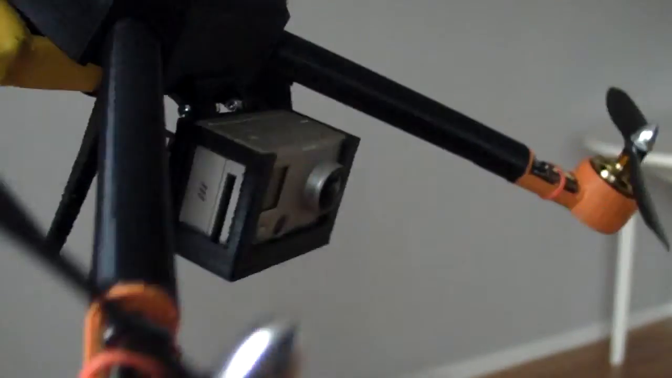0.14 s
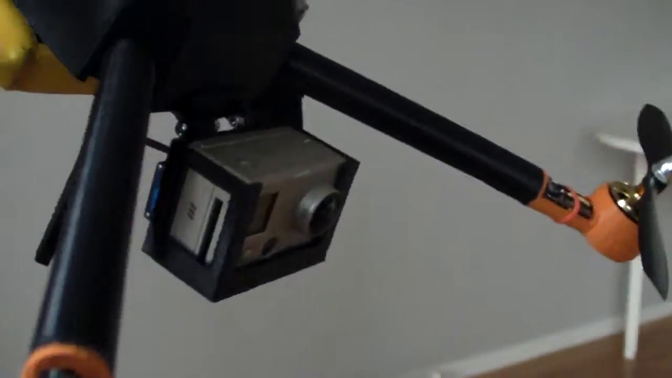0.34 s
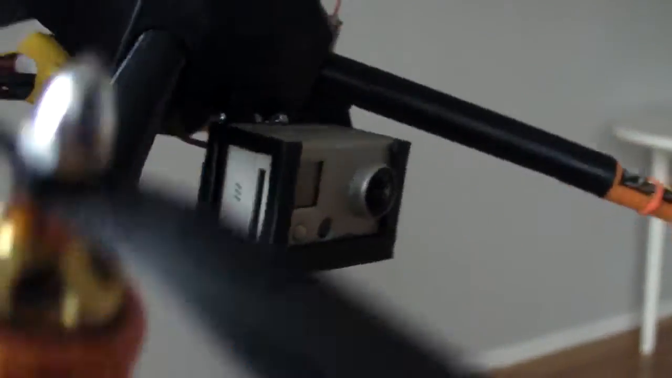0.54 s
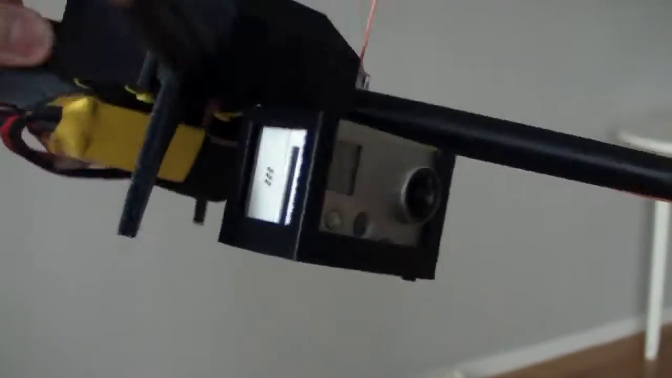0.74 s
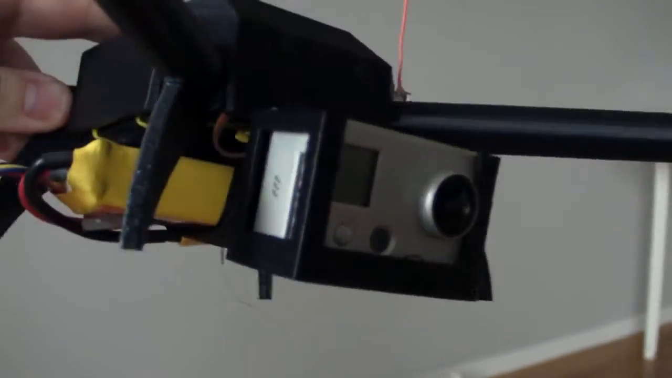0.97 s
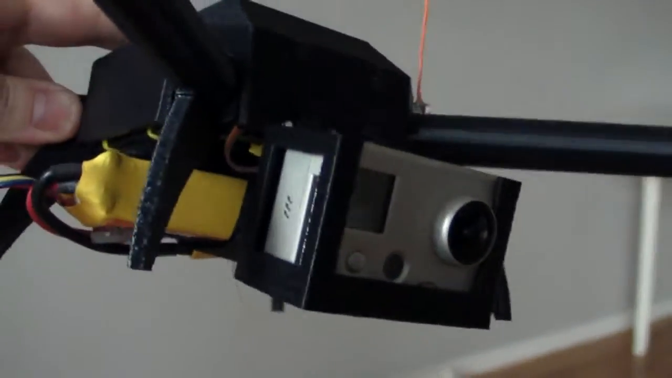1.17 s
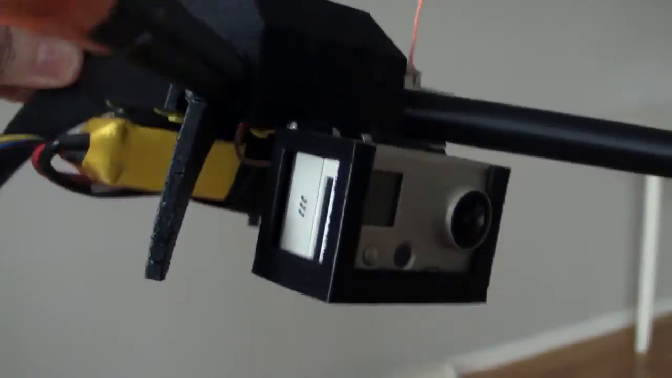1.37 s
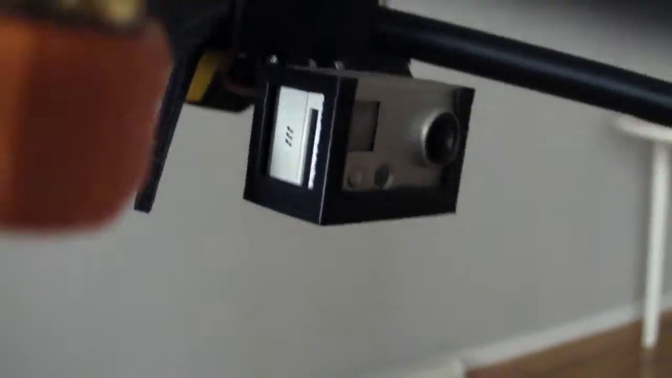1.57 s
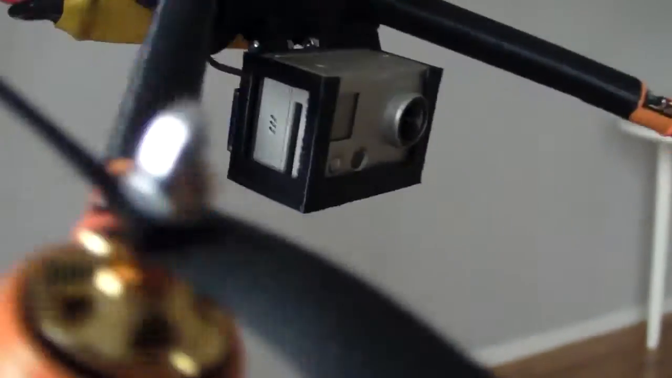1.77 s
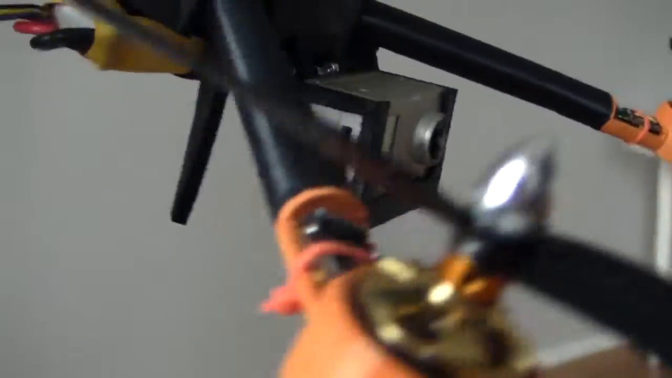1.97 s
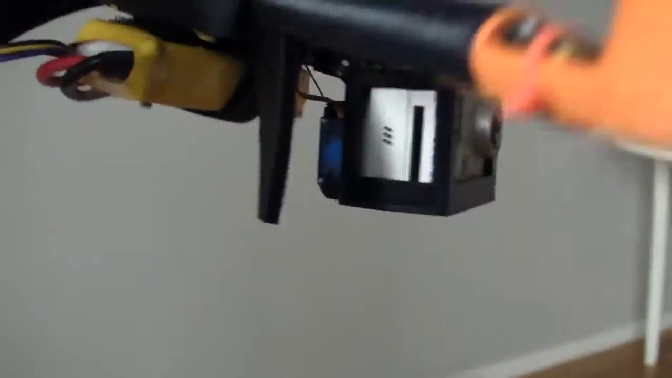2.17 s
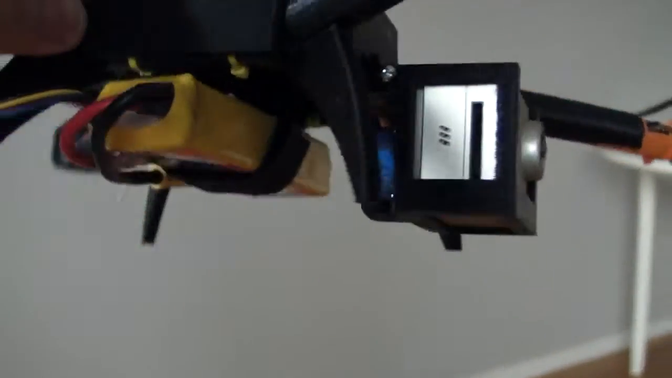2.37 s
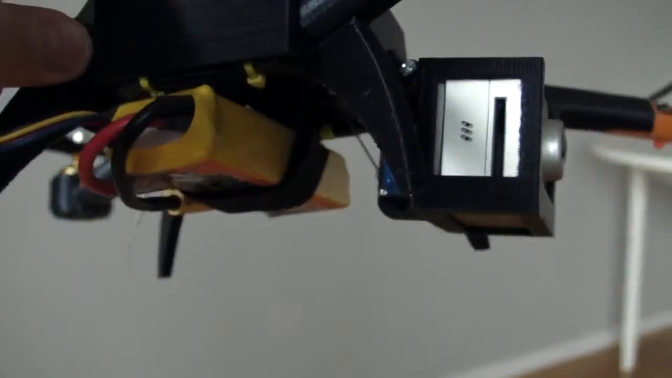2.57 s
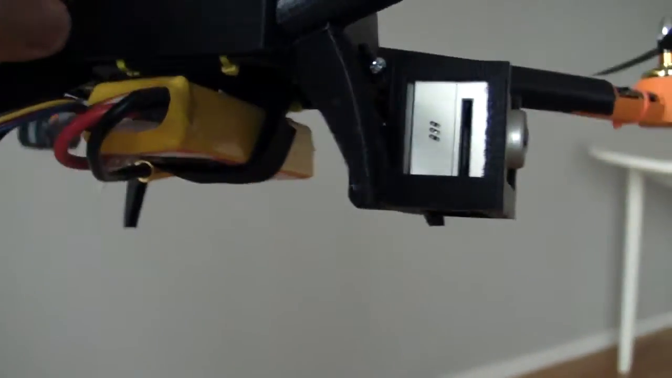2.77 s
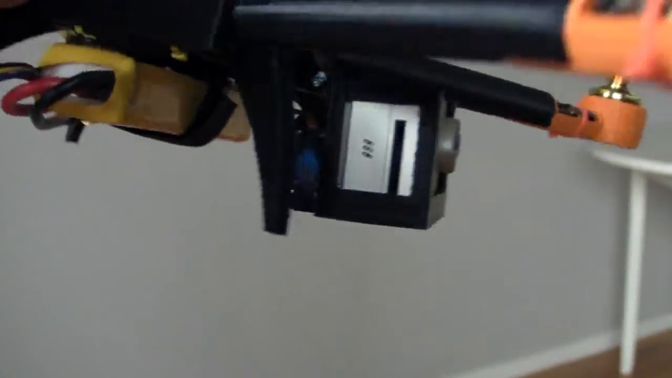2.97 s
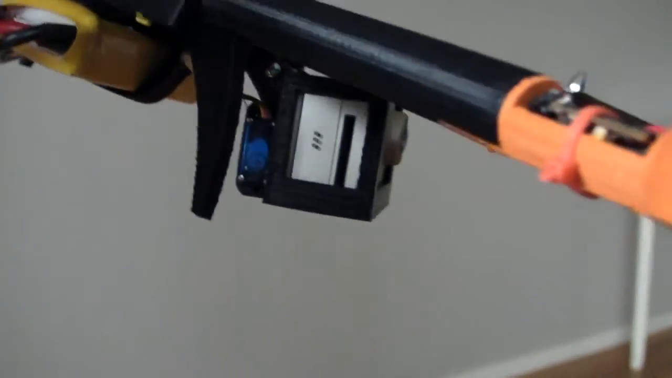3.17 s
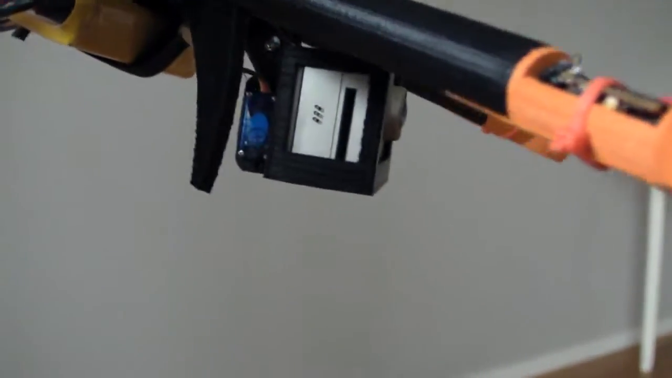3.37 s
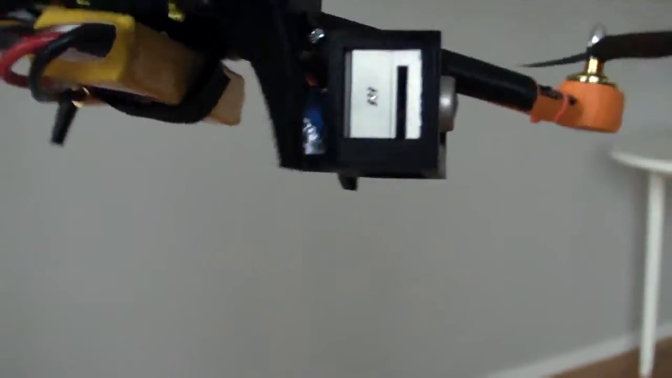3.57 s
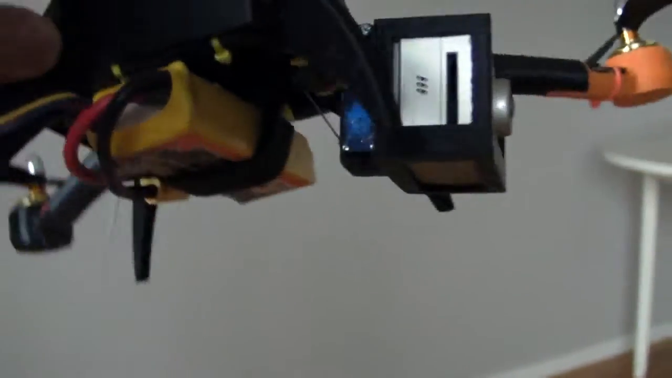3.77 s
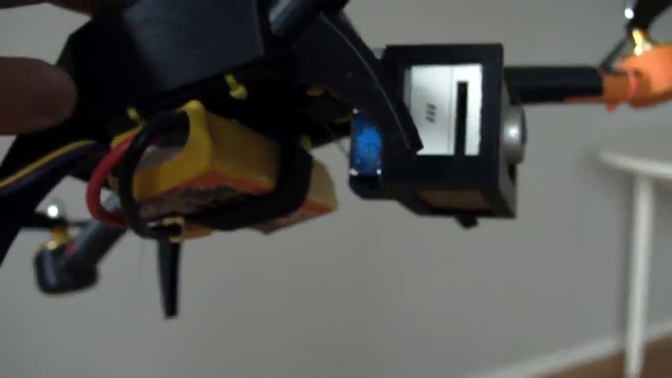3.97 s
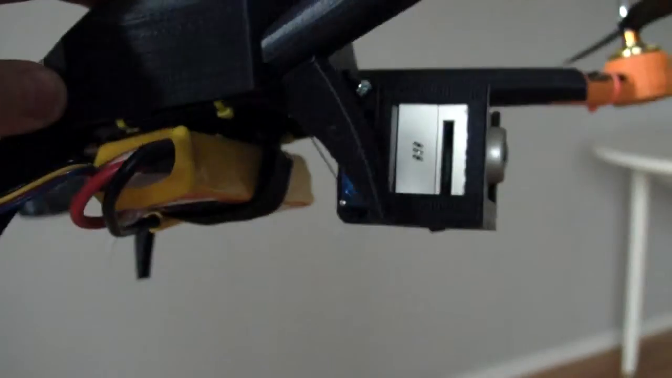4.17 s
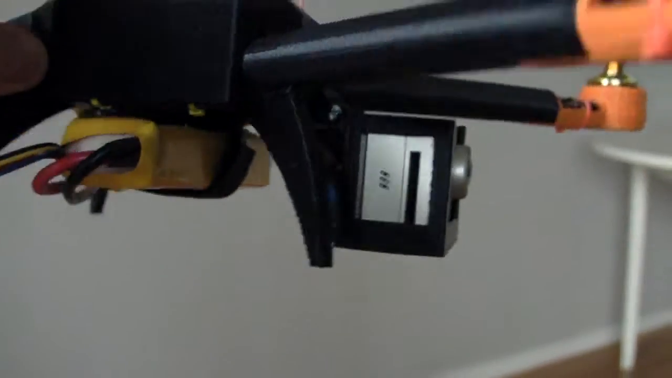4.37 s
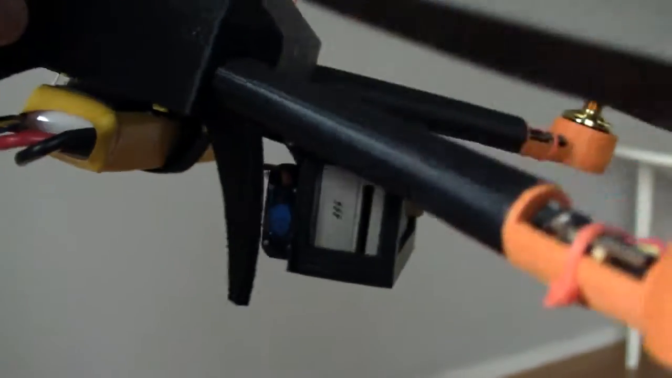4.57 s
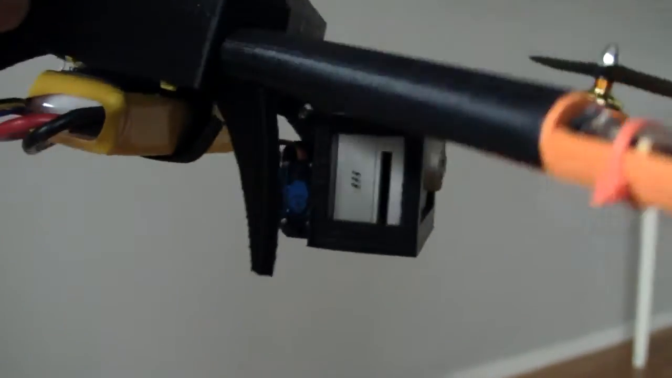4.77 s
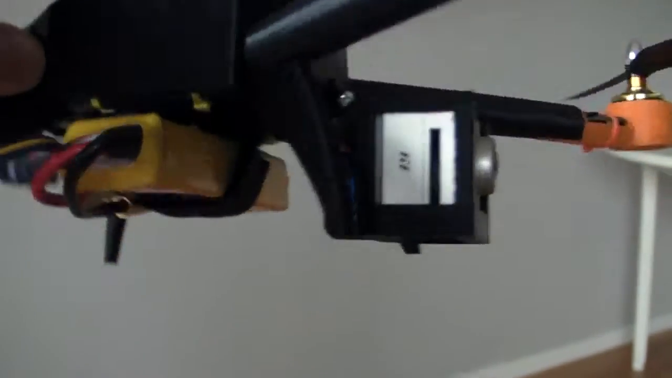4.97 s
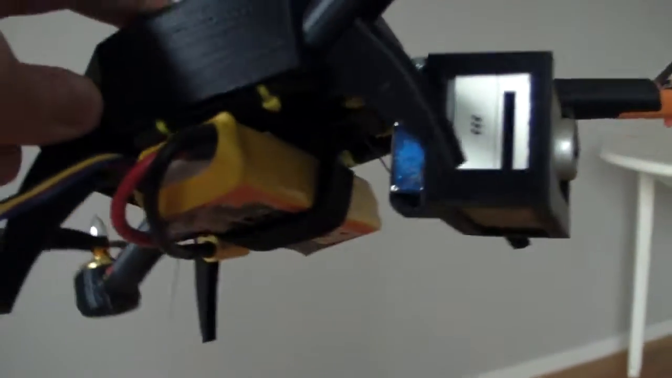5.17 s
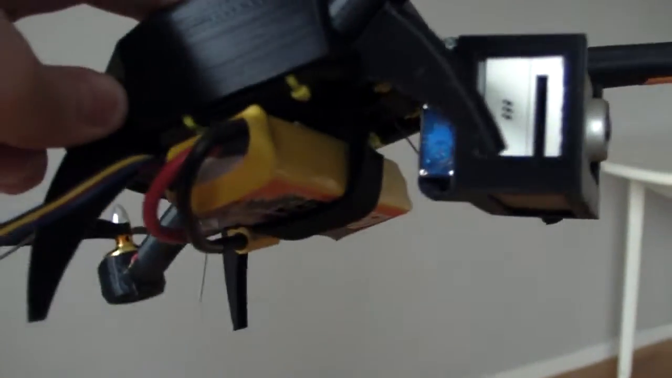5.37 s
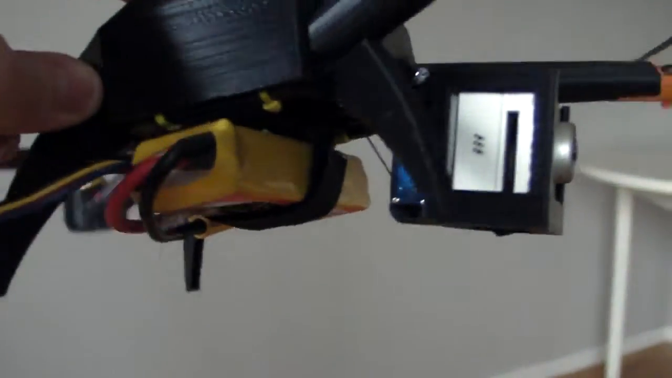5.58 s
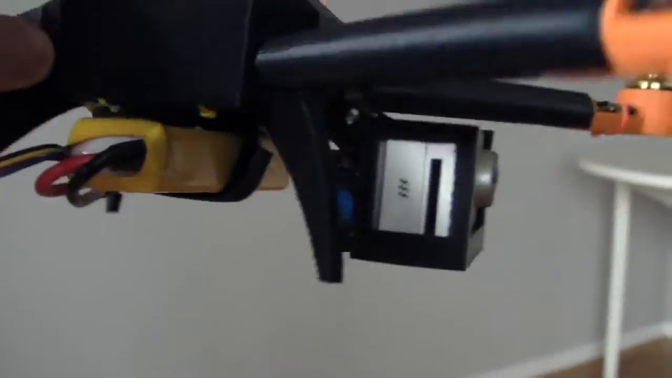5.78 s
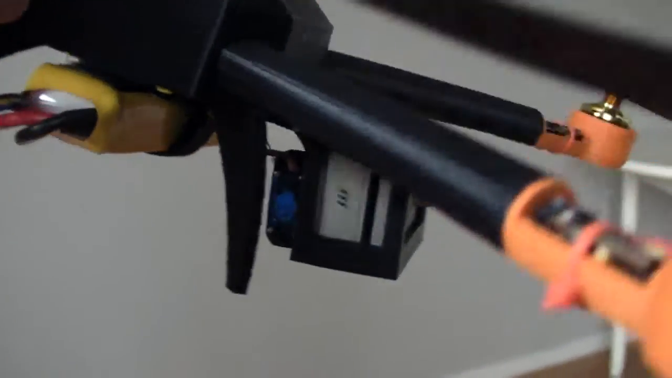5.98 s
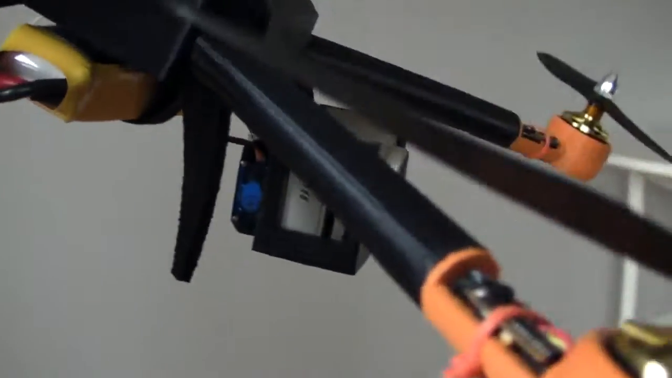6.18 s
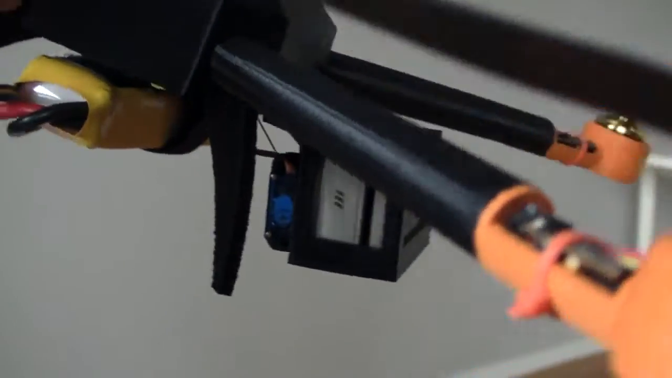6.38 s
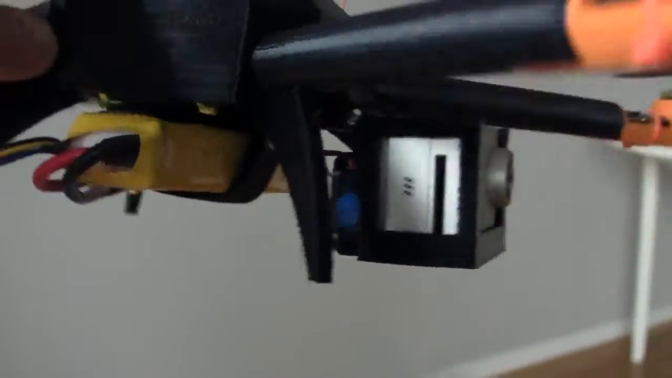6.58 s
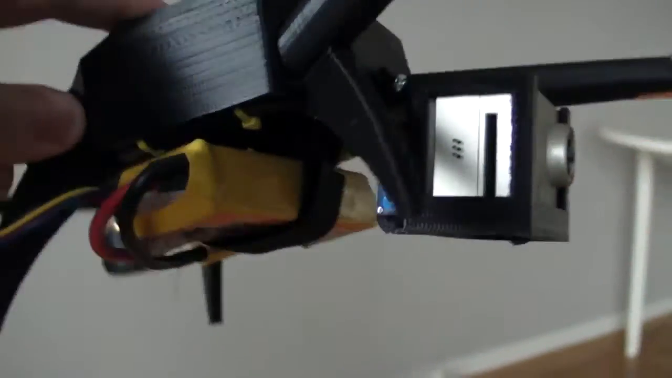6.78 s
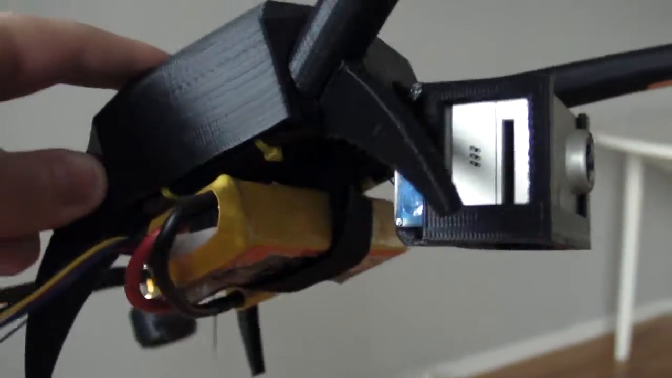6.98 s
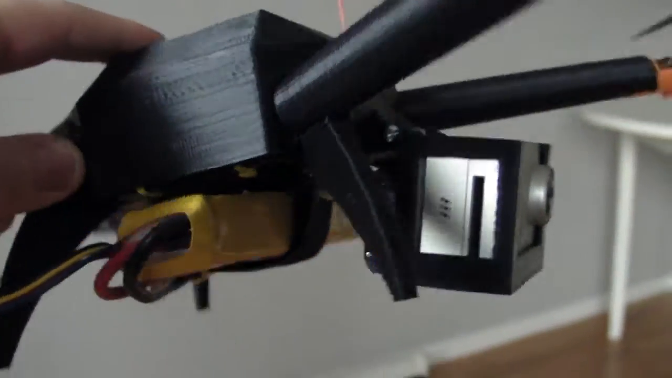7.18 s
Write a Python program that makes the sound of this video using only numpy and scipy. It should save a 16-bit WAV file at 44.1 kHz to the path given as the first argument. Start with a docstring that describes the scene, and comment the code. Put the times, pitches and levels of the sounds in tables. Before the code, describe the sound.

A tiny servo whirs in raspy, stuttering bursts with a few sharp plastic clicks, over a faint steady room hum.

```python
"""In a room, a hand rocks a small multirotor to and fro while a micro servo keeps its camera mount level.
Impacts of the plastic gear teeth excite the resonances of the case: they rattle under a train of drive
pulses, surge at each correction and now and then clack through their slack. The frame takes a few soft
knocks. Behind it a mains appliance hums over the low rush of the room's air."""
import sys
import numpy as np
from scipy import signal
from scipy.fft import rfft, irfft
from scipy.io import wavfile
from scipy.ndimage import map_coordinates

SR = 44100
rng = np.random.default_rng(int(sys.argv[2]) if len(sys.argv) > 2 else 0)


def persist_wave(psi):
    """Save psi, clipped to +-1, as 16-bit WAV."""
    counts = np.round(np.clip(psi, -1, 1) * 32767).astype(np.int16)
    wavfile.write(sys.argv[1], SR, np.atleast_2d(counts).T)


N = 318843
TIME = np.arange(N) / SR
HZ = np.fft.rfftfreq(4096, 1 / SR)
DRIVE_HZ = 55.3  # rate of the motor's drive pulses


def amp(db):
    """Amplitude ratio of a level in decibels."""
    return 10 ** (np.asarray(db) / 20)


def unit(x):
    """Normalisation to rms 1."""
    return x / np.sqrt(np.mean(x ** 2) + 1e-20)


def curve(points, hz):
    """Interpolation of rows (frequency_hz, value) on a log-frequency axis."""
    f, value = np.transpose(points)
    return np.interp(np.log(hz + 1), np.log(f), value)


def peaks(rows):
    """Lorentzian peaks and dips, in dB over HZ."""
    return sum(db / (1 + (2 * (HZ - hz) / width) ** 2) for hz, width, db in rows)


def add(mix, start_s, sound):
    """Superposition of a sound on the mix."""
    part = mix[max(round(start_s * SR), 0):][:len(sound)]
    part += sound[:len(part)]


def colour(x, db):
    """Minimum-phase filter with the gain db over HZ: it rings only after it is struck."""
    log_gain = np.log(amp(np.r_[db, db[-2:0:-1]]))
    taps = np.fft.ifft(np.exp(np.conj(signal.hilbert(log_gain)))).real
    return signal.oaconvolve(x, taps)[:len(x)]


def band(x, low_hz, high_hz):
    """Zero-phase band-pass, so that neighbouring bands join evenly; rms 1."""
    return unit(signal.sosfiltfilt(signal.butter(5, [low_hz, high_hz], "band", fs=SR, output="sos"), x))


def resonate(x, hz, width_hz):
    """Damped resonance whose centre follows the curve hz."""
    turn = np.exp(2j * np.pi * np.cumsum(hz) / SR)
    r = np.exp(-np.pi * width_hz / SR)
    return 2 * (turn * signal.lfilter([(1 - r) ** 2], [1, -2 * r, r * r], x / turn)).real


def drift(rate_hz, size):
    """Smooth random process of rms 1, changing about rate_hz times a second."""
    knots = rng.standard_normal(4096)
    coarse = np.arange(0, size + 32, 32)
    smooth = map_coordinates(knots, [coarse * rate_hz / SR], order=3, mode="wrap")
    return unit(np.interp(np.arange(size), coarse, smooth))


def crossings(turns):
    """Impulse train: one click each time the count of turns passes a whole number."""
    return np.diff(np.floor(turns), prepend=np.floor(turns[0]))


# spectrum of the room's air: frequency_hz, relative_level_db
AIR_SPECTRUM = [(15, -4), (30, -12), (60, -3.5), (110, -0.5), (170, 3.5), (270, -2), (370, 3.5), (500, -7),
                (800, -8.5), (1300, -12.5), (2500, -17.5), (5000, -23.5), (10000, -27.5), (15000, -55)]
# its likeness at the two microphones: frequency_hz, correlation
AIR_CORRELATION = [(30, 0.86), (300, 0.63), (700, 0.33), (3000, 0.82), (12000, 0)]


def air(level_db=-45.5, swell_db=2.0, crossover_hz=450):
    """Partly coherent noise: the rush of the room, its low end gently swelling."""
    hz = np.fft.rfftfreq(N, 1 / SR)
    left, other = rfft(rng.standard_normal((2, N)))
    same = np.clip(curve(AIR_CORRELATION, hz), 0, 1)
    right = same * left + np.sqrt(1 - same ** 2) * other
    spectra = np.array([left, right]) * amp(curve(AIR_SPECTRUM, hz))
    low = 1 / (1 + (hz / crossover_hz) ** 4)
    rumble = irfft(spectra * low, N) * amp(swell_db * drift(8.3, N))
    return amp(level_db) * unit(rumble + irfft(spectra * (1 - low), N))


# partials of the appliance's hum: harmonic_number, rms_level_db
HUM_HARMONICS = [(1, -88), (2, -58), (3, -58), (4, -61), (5, -57), (6, -55), (7, -60.5), (8, -62.5),
                 (9, -72.5), (10, -71)]


def hum(mains_hz=59.95, waver_db=-1.0, slip_rad=0.33):
    """Harmonic series: wavering partials, nearly in phase, sum to one soft buzz each mains cycle."""
    out = np.zeros(N)
    for harmonic, db in HUM_HARMONICS:
        peak = np.sqrt(2) * amp(db + waver_db * drift(3.38, N))
        out += peak * np.cos(2 * np.pi * harmonic * mains_hz * TIME + slip_rad * drift(1.887, N))
    return out


# reverberation time of the room: frequency_hz, t60_s
ROOM_DECAY = [(300, 0.51), (2500, 1), (7000, 0.54), (12000, 0.37)]


def room(x, early_db=-10, early_s=0.011, tail_db=-11):
    """Reverberation: early scatter from nearby things, then an exponentially decaying diffuse tail."""
    t = np.arange(SR) / SR
    taps = rng.standard_normal((2, SR)) * (rng.random((2, SR)) < .1)
    # small things scatter mostly treble
    early = np.diff(taps * np.exp(-t / early_s) * (t > .0005), prepend=0)
    hz, when, spectra = signal.stft(taps * (t > .008), SR, nperseg=256)
    decay = amp(-60 * when / curve(ROOM_DECAY, hz)[:, None])
    tail = signal.istft(spectra * decay, SR, nperseg=256)[1][:, :SR]
    response = sum(amp(db) * part / np.linalg.norm(part, axis=1, keepdims=True)
                   for db, part in ((early_db, early), (tail_db, tail)))
    return signal.fftconvolve(x[None], response, axes=1)[:, :N]


def airframe(x, echo_db=-6.5, delays_s=(.000295, .003), sway_s=.00007, apart_s=.000026, count=8):
    """Comb filtering: reflections off arms and battery shift as the craft rocks, unlike on each side."""
    echoes, samples = np.zeros((2, N)), np.arange(N)
    oversampled = signal.resample_poly(x, up=4, down=1)
    for delay in np.geomspace(*delays_s, count):
        path = delay * rng.uniform(.8, 1.2) + sway_s * drift(3.5, N)
        sign = rng.choice([-1, 1])
        side = apart_s * rng.choice([-1, 1]) * rng.uniform(.5, 1.5)
        for echo, lag in zip(echoes, (path - side, path + side)):
            echo += sign * map_coordinates(oversampled, [4 * (samples - lag * SR)], order=1)
    return (x + amp(echo_db) * echoes / np.sqrt(count)) / np.sqrt(1 + amp(2 * echo_db))


# left microphone relative to the right: frequency_hz, phase_lead_rad, level_db
PAIR_RESPONSE = [(3800, 1, 0), (6200, -0.79, -0.5), (7450, -0.027, 0.5), (8300, -0.65, -0.5),
                 (9800, -1.62, 2.5), (11600, -1.57, 0), (12400, -2.3, -5.5), (15000, -1.2, -2)]


def microphone_pair(x, taper_hz=5000):
    """Phase and level cues of near sound at two microphones; the phase lead fades out below taper_hz."""
    rows = np.array(PAIR_RESPONSE)
    lead = curve(rows[:, :2], HZ) * np.minimum(HZ / taper_hz, 1) ** 2
    half = np.exp(.5j * lead) * amp(curve(rows[:, ::2], HZ) / 2)
    taps = np.fft.fftshift(irfft(np.array([half, 1 / half])), axes=1)
    return signal.oaconvolve(x, taps, axes=1)[:, len(HZ) - 1:][:, :N]


# soft knocks on the frame: start_s, level_db, pitch_hz, t60_s
FRAME_KNOCKS = [(2.776, -28, 257, 0.024), (2.8, -29.5, 155, 0.09), (3.3749, -30.5, 390, 0.084),
                (6.118, -35.5, 684, 0.033)]


def knocks():
    """Damped free vibration: each dull thud is one quickly decaying mode."""
    out, t = np.zeros(N), np.arange(SR // 4) / SR
    for start, db, hz, t60 in FRAME_KNOCKS:
        add(out, start, amp(db - 60 * t / t60) * np.sin(2 * np.pi * hz * t))
    return out


# modes of the frame: pitch_hz, relative_level_db, t60_s
FRAME_MODES = [(1923, -12, 0.045), (2274, -12, 0.09), (2410, -1, 0.017), (2545, -11, 0.07),
               (2830, -14.5, 0.033), (3190, -9, 0.032), (3660, -5.5, 0.039), (3910, 4, 0.012),
               (5640, 0, .02), (7640, 6, 0.019)]


def frame_ring(t, vary_db=2, attack_s=0.00022):
    """Modal superposition: a blow rings every mode of the frame, each with its own decay."""
    ring = np.zeros(len(t))
    for hz, db, t60 in FRAME_MODES:
        envelope = amp(db + vary_db * rng.uniform(-1, 1) - 60 * t / t60)
        ring += envelope * np.sin(2 * np.pi * (hz * t + rng.random()))
    return ring * (1 - np.exp(-t / attack_s))


# spectrum of a tooth's crack: frequency_hz, relative_level_db
CRACK_SPECTRUM = [(300, -31), (1200, -30), (1900, 3), (4500, -8), (6500, 4), (10500, 9.5), (12500, -5),
                  (15000, -8)]
# jumps of the gears through their slack: time_s, crack_db, ring_db, squeak_db, grind_db, low_cut_hz
BACKLASH_JUMPS = [(0.0515, -9, -22.5, -28, -33.5, 2180), (0.631, -17, -45, -60, -55, 3000),
                  (0.776, -18, -49, -62, -60, 3000), (0.833, -24, -44, -60, -60, 4500),
                  (0.8835, -21, -42, -60, -62, 4500), (1.7088, -12, -24.5, -18, -33, 2220),
                  (3.1558, -19, -19.5, -22, -32.5, 1610), (6.116, -2, -17.5, -46, -40, 1610),
                  (6.4246, -26, -35, -67, -55, 1500), (6.464, -24, -41, -55, -62, 1500)]


def clacks(climb_s=0.0039, crack_s=0.001, bounce_s=.0045, bounce_db=-14,
           grind_s=0.016, grind_width_hz=2300, squeak_hz=13500, squeak_s=0.001):
    """Backlash: a tooth grinds up its neighbour, snaps over and squeaks; loose parts rebound twice."""
    out, t = np.zeros(N), np.arange(-SR // 25, SR // 3) / SR
    after = np.maximum(t, 0)
    grinding = np.exp(-abs(t) / grind_s)
    force = np.where(t < 0, amp(-20) * np.exp(-abs(t) / climb_s), np.exp(-after / crack_s))
    for when, crack_db, ring_db, squeak_db, grind_db, low_hz in BACKLASH_JUMPS:
        high_pass = signal.butter(4, low_hz, "high", fs=SR, output="sos")
        for k in range(3):
            ring = frame_ring(after)
            crack = unit(colour(rng.standard_normal(len(t)), curve(CRACK_SPECTRUM, HZ))) * force
            # on a rebound the crack loses twice as many decibels as the ring
            blow = amp(crack_db + k * bounce_db) * crack + amp(ring_db) * ring
            delay = k * bounce_s * (1 + 0.22 * rng.uniform(-1, 1))
            add(out, when + t[0] + delay, amp(k * bounce_db) * signal.sosfilt(high_pass, blow))
        grind = band(teeth(t, np.ones(len(t))), low_hz, low_hz + grind_width_hz) * grinding
        squeak = unit(resonate(rng.standard_normal(len(t)), np.full(len(t), squeak_hz), width_hz=1500))
        squeak *= np.exp(-abs(t) / squeak_s) + amp(-15) * grinding
        add(out, when + t[0], amp(grind_db) * grind + amp(squeak_db) * squeak)
    return out


def teeth(t, speed, mesh_hz=1000, hunt=.1, play=.07, catch_db=0.62,
          shaft_hz=340.7, bind_s=.00055, bind_spread_db=4.6, free_run=.72, scrape=0.7):
    """Impact and friction: loose teeth strike unevenly, slide, and bind once a shaft turn; rms 1."""
    force_db, sliding, bite = rng.standard_normal((3, len(t)))
    pace = speed ** .2
    mesh_turns = np.cumsum(mesh_hz * pace * np.exp(hunt * drift(45, len(t)))) / SR
    mesh_turns = np.maximum.accumulate(mesh_turns + play * drift(1100, len(t)))
    impacts = crossings(mesh_turns) * amp(np.clip(force_db, -2, 2))
    contact = unit(impacts) + scrape * sliding
    # each bind swells to a clump of chatter that peaks after bind_s
    shaft_turns = np.cumsum(shaft_hz * pace * np.exp(.2 * drift(120, len(t)))) / SR
    binds = crossings(shaft_turns) * amp(bind_spread_db * np.clip(bite, -2, 1))
    clumps = unit(signal.lfilter([1], np.poly([np.exp(-1 / (bind_s * SR))] * 2), binds))
    # the motor gets one push for each drive pulse
    throb_db = .9 * np.cos(2 * np.pi * DRIVE_HZ * t + .5 * drift(10, len(t)))
    return unit(contact * (free_run + clumps) * amp(throb_db + catch_db * drift(160.7, len(t))))


# gear case driven on the backward or the forward tooth flank: frequency_hz, gain_db
BACKWARD_FLANK = [(100, -40.5), (1500.0, -18.5), (2000.0, -21), (3000.0, -19.5), (3600.0, -14),
                  (4300.0, -11.5), (5000.0, 0), (5600.0, 5.5), (6200.0, 1.5), (7200.0, 4.5), (7700, 8),
                  (8800.0, 2), (10600.0, -12), (12200.0, -21.5), (15000, -27.5)]
FORWARD_FLANK = [(100, -42), (1500.0, -22), (2000.0, -25.5), (3000.0, -23), (3600.0, -16.5),
                 (4300.0, -20.5), (5000.0, -4), (5600.0, 5), (6200.0, 9.5), (7200.0, 8), (8800.0, 3.5),
                 (10600.0, -4.5), (12200.0, -15), (15000, -23)]
# narrow resonances and dips of case and mount: centre_hz, width_hz, gain_db
CASE_RESONANCES = [(1030, 110, -7.5), (1594, 280, -7), (1947, 160, 5.5), (2223, 136, 7.5), (2566, 65, 4.5),
                   (3100, 160, 2), (3820, 140, -1), (4270, 220, -1), (4578, 60, 8), (5760, 300, 0.5),
                   (6150, 350, -4), (7710, 130, 3.5), (8570, 320, 4), (9670, 300, -2)]


def gear_case(x, forward, hollow_db, spacing_hz=125, shift_hz=23, peak_limit=1.6, count=11):
    """Forced vibration: the teeth ring the case, whose many small resonances come and go at random."""
    flank = FORWARD_FLANK if forward else BACKWARD_FLANK
    case_db = curve(flank, HZ) + peaks(CASE_RESONANCES) + hollow_db
    weights = np.array([np.exp(5.6 * drift(shift_hz, len(x))) for _ in range(count)])
    weights /= weights.sum(axis=0)
    depth_db = np.interp(HZ, [3500, 6000], [6, 4.5])
    out = np.zeros(len(x))
    for weight in weights:
        knots = rng.standard_normal(len(HZ))
        ripple = unit(map_coordinates(knots, [HZ / spacing_hz], order=3, mode="wrap"))
        out += weight * colour(x, case_db + depth_db * np.minimum(ripple, peak_limit))
    return out


def nudges(share=0.41, level_db=-2, spread_db=3, length_s=0.013):
    """Random trials: some drive pulses bring a small correction; rows time_s, relative_db, length_s."""
    pulses = np.arange(0, N / SR, 1 / DRIVE_HZ)
    chosen = rng.random(len(pulses)) < share
    levels = level_db + spread_db * rng.standard_normal(len(pulses))
    return [(when, db, length_s) for when, db in zip(pulses[chosen], levels[chosen])]


def correction_power(rows):
    """Addition of powers: each correction bites quickly and lets go more gently."""
    power, t = np.zeros(N), np.arange(-SR // 20, SR // 20) / SR
    for when, db, length in rows:
        reach = abs(2 * t / length)
        add(power, when + t[0], amp(2 * db) * .5 ** np.where(t < 0, reach ** 4, reach ** 3))
    return power


# the motor's corrections, from twitches to long pushes: peak_s, level_db, length_s
CORRECTIONS = [(.066, -26, 0.02), (.102, -30, 0.015), (.114, -36, 0.0055), (.561, -31, 0.0042),
               (.579, -30, 0.019), (.602, -24.5, 0.007), (.617, -24, 0.019), (.644, -33, 0.011),
               (.696, -22, 0.011), (.75, -26.5, 0.0074), (.812, -31, 0.0048), (.833, -25, 0.004),
               (.85, -26.5, 0.02), (.867, -32, .006), (.891, -19.5, 0.002), (.905, -27, 0.013),
               (.961, -22.5, 0.019), (.972, -19.5, 0.0027), (.993, -23, 0.0025), (1.015, -25, 0.021),
               (1.025, -23, 0.0044), (1.078, -27, 0.0023), (1.1, -28, 0.0019), (1.127, -28, 0.0023),
               (1.17, -22, 0.011), (1.188, -39, 0.0026), (1.226, -23, 0.0069), (1.241, -22.5, 0.0082),
               (1.283, -24, 0.0067), (1.303, -25, 0.019), (1.342, -25.5, 0.024), (1.386, -25, 0.0081),
               (1.401, -25, 0.0078), (1.441, -29, .008), (1.458, -31, .014), (1.508, -29, 0.023),
               (1.54, -39, 0.012), (1.59, -25, 0.038), (1.651, -25.5, 0.026), (1.68, -26, 0.025),
               (1.705, -27.5, 0.03), (1.732, -26.5, 0.029), (1.772, -23.5, 0.017), (1.787, -29, .014),
               (2.048, -38, 0.028), (2.087, -29, 0.01), (2.121, -31, 0.016), (2.137, -30, 0.027),
               (2.2, -37, 0.014), (2.27, -35, 0.0087), (2.312, -36, 0.011), (2.35, -35, 0.01),
               (2.516, -29, 0.0017), (2.532, -24.5, 0.0026), (2.579, -39, 0.0052), (2.679, -42, 0.009),
               (2.735, -32.5, 0.012), (2.754, -26.5, 0.011), (2.818, -37, 0.017), (2.859, -32, 0.005),
               (2.877, -28, 0.0033), (2.952, -29, .006), (2.966, -28, 0.0098), (3.005, -31.5, 0.033),
               (3.146, -32, .012), (3.19, -36, 0.011), (3.205, -34, 0.0087), (3.314, -37, 0.0049),
               (3.412, -29.5, .008), (3.446, -35, 0.014), (3.492, -34, 0.029), (3.6, -31, 0.0056),
               (3.624, -30, 0.0044), (3.656, -28, .012), (3.698, -31, .003), (3.715, -26, 0.0026),
               (3.8, -26, 0.017), (3.837, -24, .009), (3.927, -30.5, 0.0022), (4.017, -26.5, .007),
               (4.06, -37, 0.042), (4.09, -42, 0.034), (4.141, -33, 0.042), (4.19, -33.5, 0.012),
               (4.218, -30, 0.022), (4.277, -32.5, 0.0071), (4.339, -27.5, 0.006), (4.359, -28.5, 0.0083),
               (4.643, -33, 0.007), (4.742, -39.5, .012), (4.792, -35, 0.011), (4.903, -31, 0.0087),
               (4.977, -23.5, 0.019), (5.046, -33, 0.017), (5.079, -28, 0.0055), (5.152, -27, 0.007),
               (5.167, -28.5, 0.025), (5.243, -34, 0.007), (5.274, -31, 0.011), (5.326, -34, .002),
               (5.395, -37.5, 0.015), (5.44, -51, 0.017), (5.489, -35, 0.0065), (5.536, -31, .007),
               (5.596, -29, 0.014), (5.629, -29, .0076), (5.661, -23, 0.013), (5.753, -27.5, 0.016),
               (5.78, -31, 0.014), (5.827, -43, 0.0084), (5.89, -33, 0.011), (5.917, -33, 0.008),
               (5.965, -29, 0.011), (6.029, -37, .012), (6.061, -31, 0.011), (6.32, -43, 0.02),
               (6.354, -38, 0.031), (6.807, -27.5, 0.027), (6.869, -29, 0.017), (7.126, -31.5, 0.017),
               (7.161, -23.5, 0.017), (7.202, -27.5, 0.014)]
# swings of the mount, backward and forward in turn; servo() offsets the three relative levels:
# start_s, end_s, gear_db, run_up_s, slow_down_s, rattle_db, bright_db,
# whine_hz, hollow_ring_hz, hollow_gain_db
MOUNT_SWINGS = [ (-0.02, 0.135, -24.5, 0.023, 0.019, -13.5, -4.5, 6070, 3500, 6),
                (0.522, 1.125, -26.5, 0.085, 0.42, -15.5, -8, 6950, 3720, 5),
                (1.16, 1.92, -32, 0.057, 0.42, -12.5, -8.5, 6520, 3770, 7.5),
                (2.026, 2.62, -33, 0.17, 0.23, -12.5, -5, 6150, 3550, 2),
                (2.66, 3.32, -30.5, 0.38, 0.28, -15, -8, 5700, 3200, -3),
                (3.402, 3.965, -28.5, 0.18, 0.23, -15, -6, 6600, 1940, 2.5),
                (4.003, 4.655, -29.5, 0.46, 0.098, -15.3, -9.5, 5750, 5530, 4),
                (4.715, 5.33, -31, 0.21, 0.25, -13, -5, 6140, 1930, 4),
                (5.375, 6.29, -29.5, 0.28, 0.51, -15.5, -10, 5760, 5550, 3),
                (6.285, 6.91, -28.5, 0.35, 0.06, -13.5, -4.5, 6200, 1940, 4.5),
                (7.108, 7.3, -28.5, 0.073, .02, -17.5, -5, 5740, 5500, 0.5), ]


def servo(start_speed=0.115, stop_speed=0.081, take_hold_s=.022, coast_s=.045,
          low_hz=4400, high_hz=9500, whine_db=-8, whine_wander=.018):
    """Gear-mesh excitation: the fast gears ring the case, the slower output gear shakes the frame."""
    out = np.zeros(N)
    surge_power, nudge_power = correction_power(CORRECTIONS), correction_power(nudges())
    for k, swing in enumerate(MOUNT_SWINGS):
        start, end, gear_db, rise, fall, rattle_db, bright_db, whine_hz, hollow_hz, lift_db = swing
        forward = k % 2
        during = (TIME >= start) & (TIME <= end + coast_s)
        t = TIME[during]
        # speed is a share of full speed; the motor gathers it slowly at first
        run_up = start_speed + (1 - start_speed) * np.minimum((t - start) / rise, 1) ** 1.5
        speed = np.minimum(run_up, np.interp(t, [end - fall, end], [1, stop_speed]))
        hollow_db = peaks([(hollow_hz, 0.099 * hollow_hz, lift_db)])
        fast = gear_case(teeth(t, speed), forward, hollow_db)
        output_teeth = teeth(t, speed, mesh_hz=400, hunt=.12, play=.1, catch_db=-0.03)
        slow = gear_case(output_teeth, forward, hollow_db)
        # the whine's pitch wanders slightly at random
        whine = resonate(teeth(t, speed), whine_hz * (1 + whine_wander * drift(14, len(t))), width_hz=750)
        treble = amp(bright_db - 1) * speed ** 0.16 * band(fast, high_hz, 15760)
        gears = band(fast, low_hz, high_hz) + np.sqrt(speed) * amp(whine_db) * unit(whine) + treble
        # at low speed the motor stalls between drive pulses; the load wavers with the hand
        stutter_db = 2 * (1 - speed) * np.cos(2 * np.pi * DRIVE_HZ * t)
        load_db = -0.72 * drift(18, len(t))
        steady = speed * amp(gear_db - 3.5 + stutter_db + load_db)
        push = np.sqrt(steady ** 2 * (1 + nudge_power[during]) + surge_power[during])
        # the heavy frame follows the surges only in part
        follow = (push / (speed * amp(gear_db))) ** 0.27
        shake = amp(gear_db + rattle_db + 2) * speed ** 0.35 * follow
        running = np.interp(t, [start, start + take_hold_s, end, end + coast_s], [0, 1, 1, 0]) ** 2
        out[during] += running * (push * gears + shake * band(slow, 484, low_hz))
    return out


def scene():
    """Direct and reverberant fields: the mount close to the microphones, over the hum and the air."""
    whirr, hits = servo(), clacks() + knocks()
    return microphone_pair(airframe(whirr) + hits) + room(whirr + hits) + hum() + air()


# a narrow peak and two dips in the microphones' response: centre_hz, width_hz, gain_db
MICROPHONE_PEAKS = [(7500, 390, 2), (7964, 88, -8.5), (8220, 200, -15)]


def record(dry):
    """Linear filtering: the microphones' frequency response, then a steep band limit."""
    heard = np.array([colour(channel, peaks(MICROPHONE_PEAKS)) for channel in dry])
    low_pass = signal.firwin(511, cutoff=15900, window=("kaiser", 9), fs=SR)
    return signal.oaconvolve(heard, low_pass[None], "same", axes=1)


dry = scene()
out = record(dry)
persist_wave(out)
```